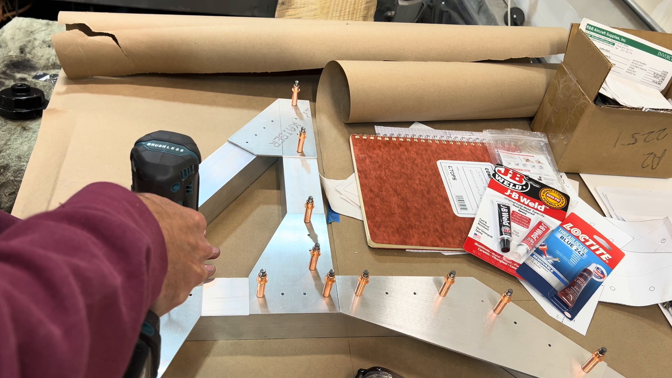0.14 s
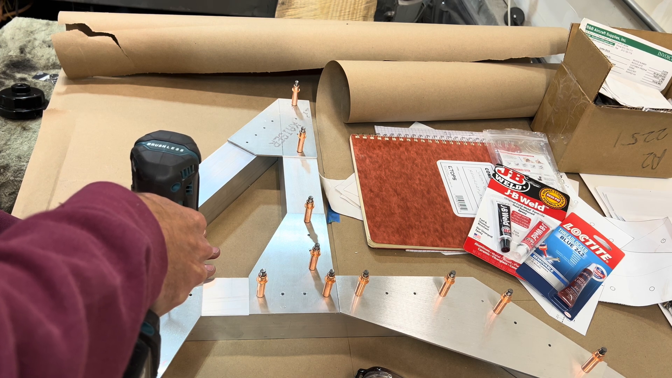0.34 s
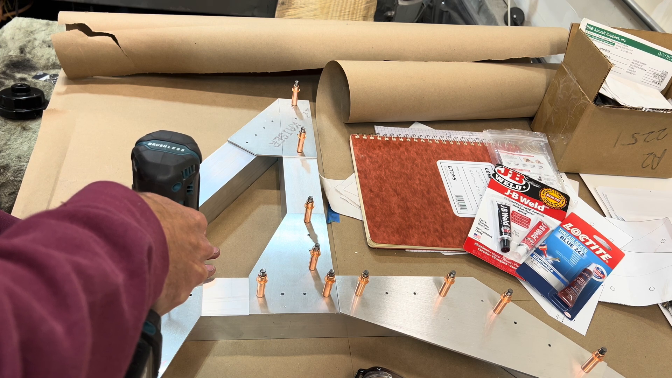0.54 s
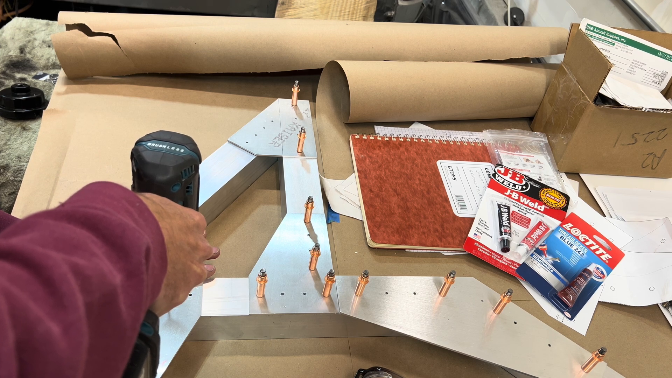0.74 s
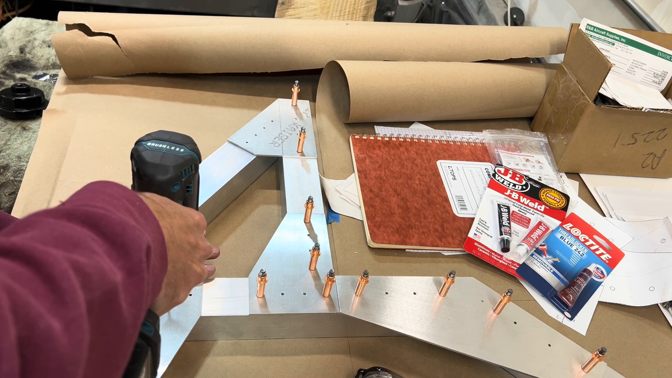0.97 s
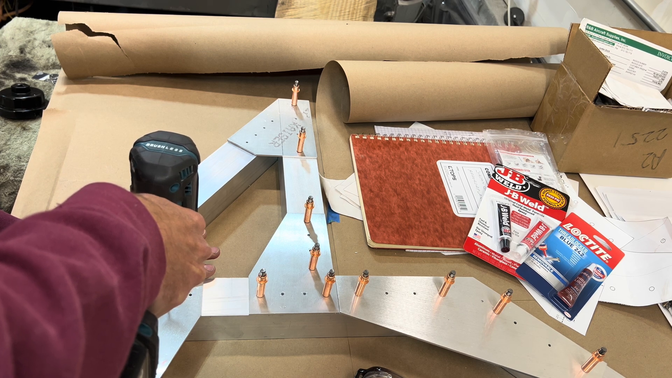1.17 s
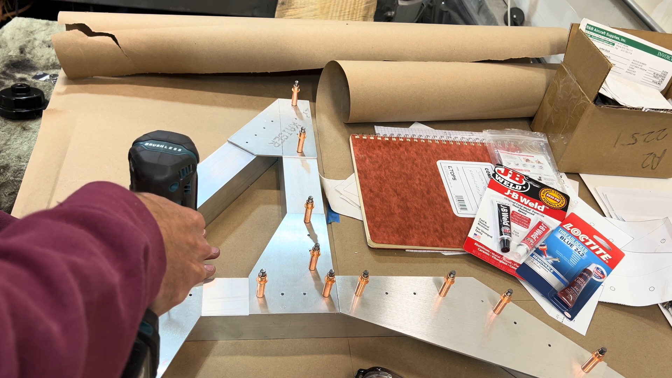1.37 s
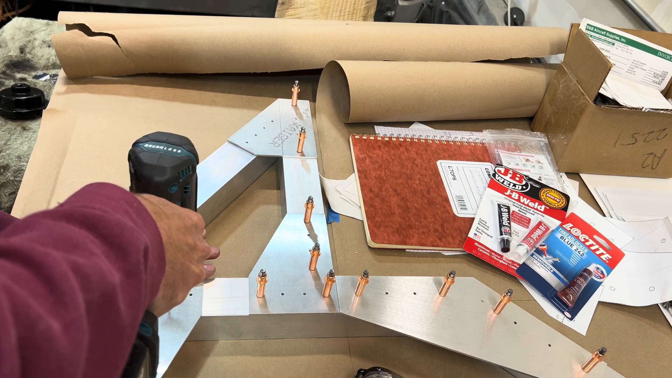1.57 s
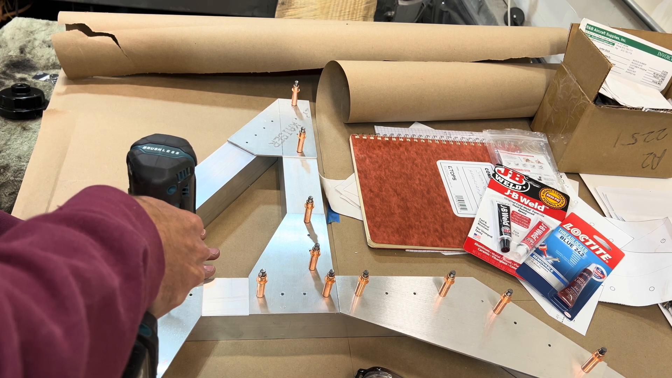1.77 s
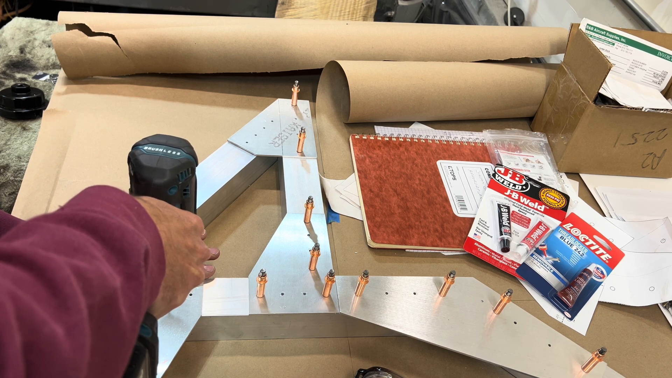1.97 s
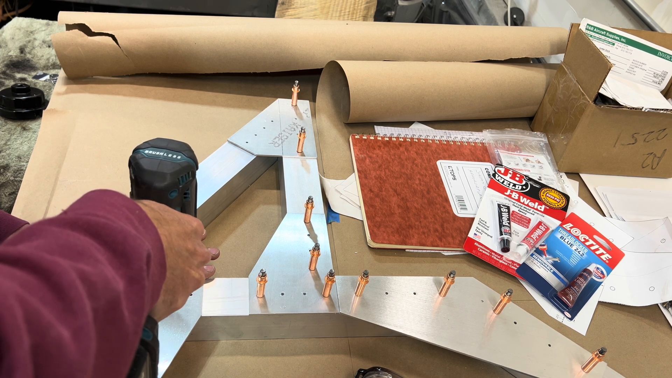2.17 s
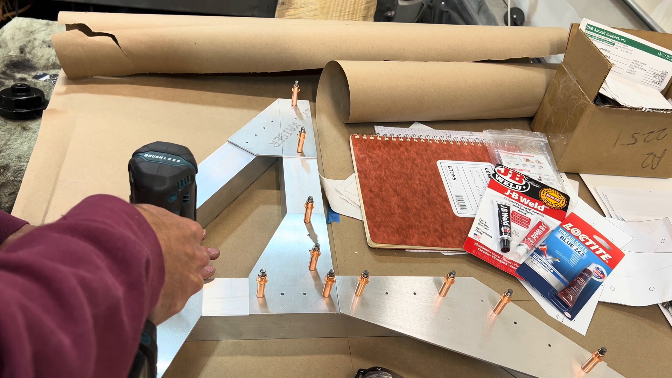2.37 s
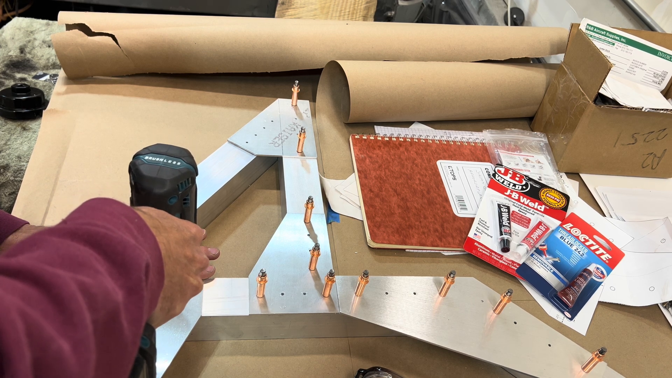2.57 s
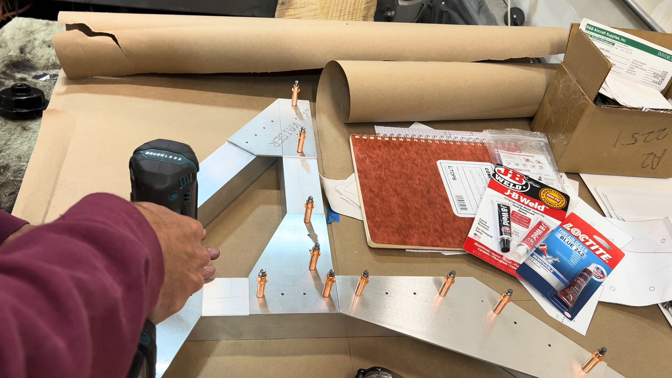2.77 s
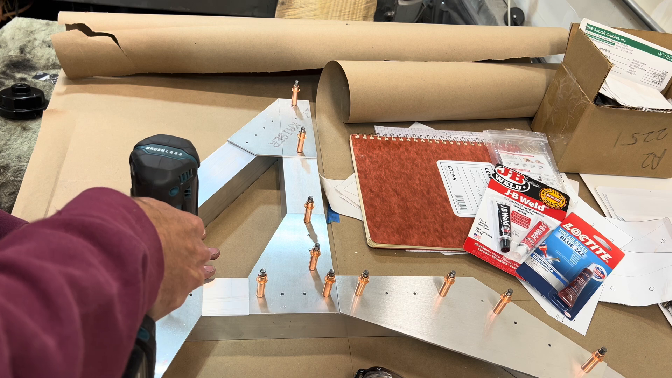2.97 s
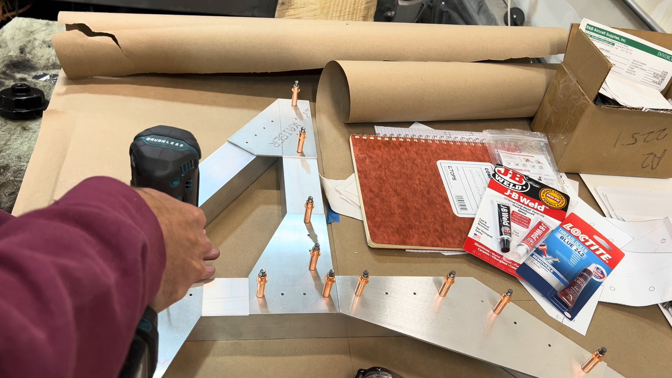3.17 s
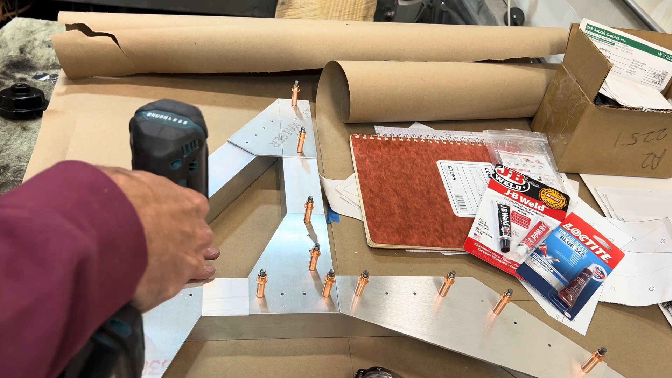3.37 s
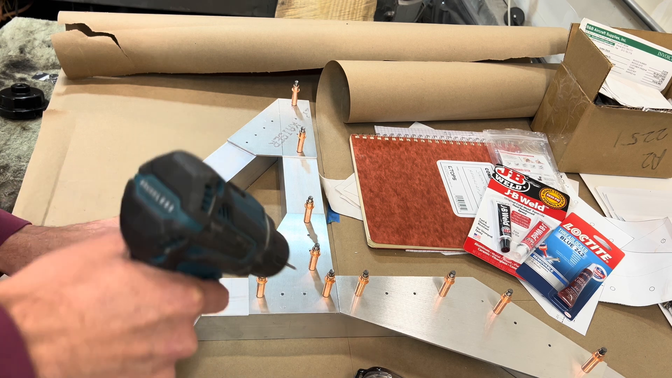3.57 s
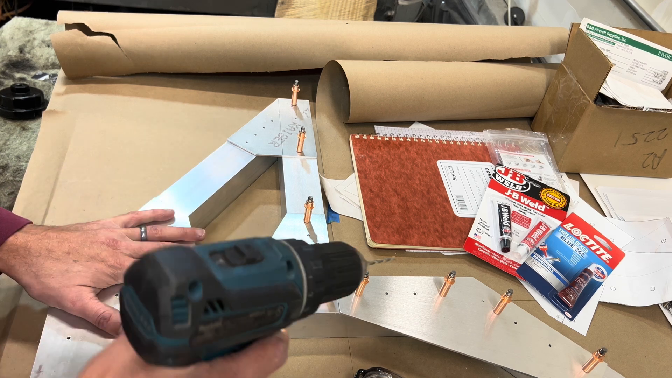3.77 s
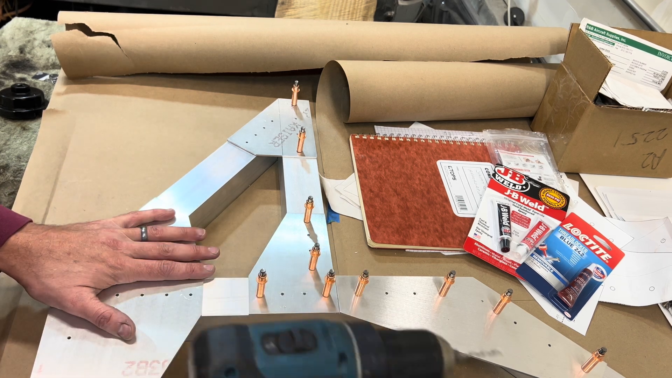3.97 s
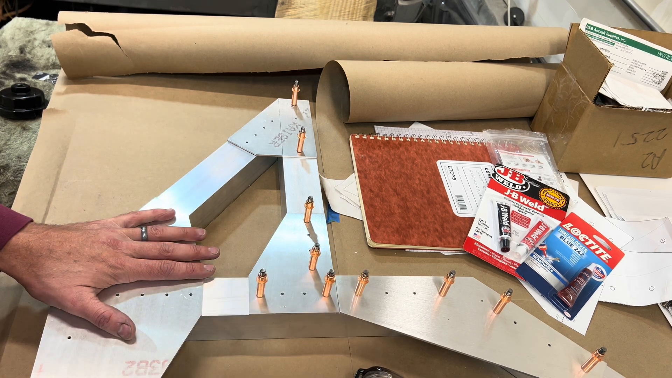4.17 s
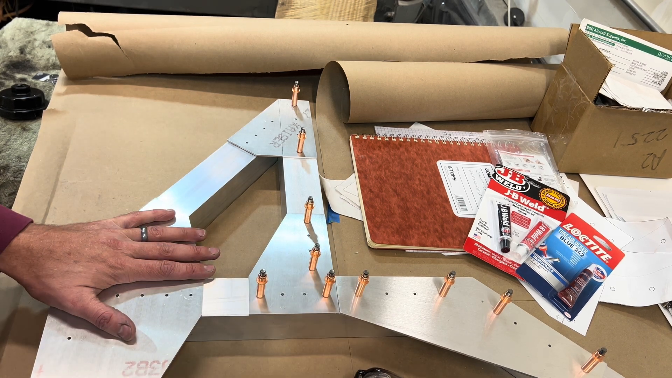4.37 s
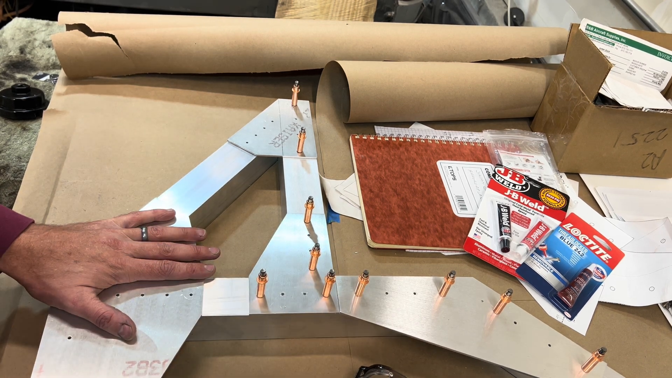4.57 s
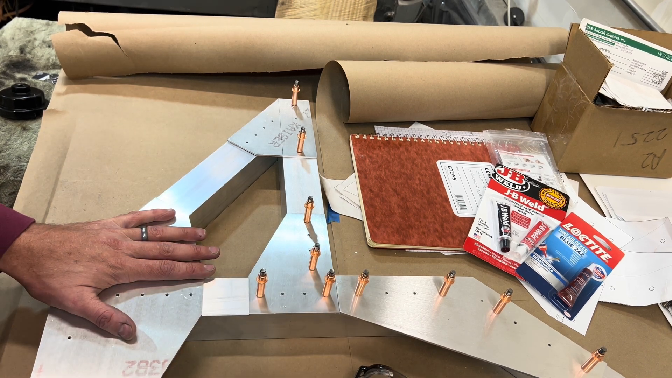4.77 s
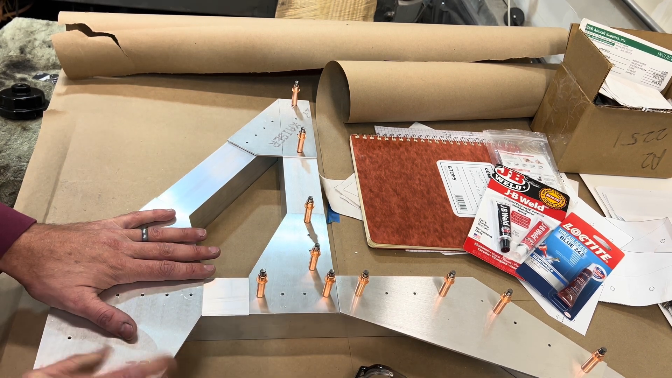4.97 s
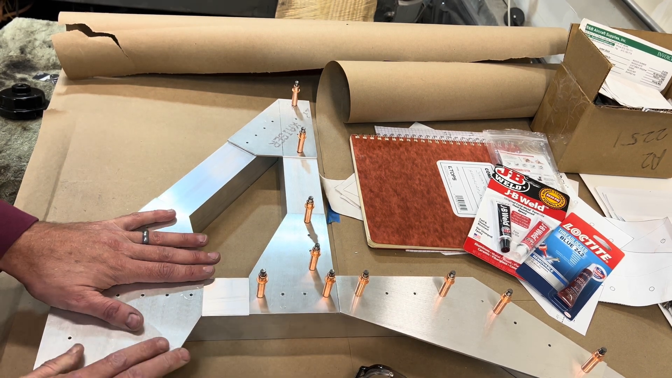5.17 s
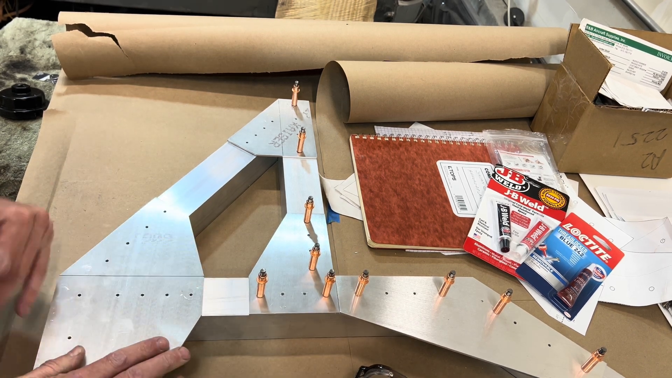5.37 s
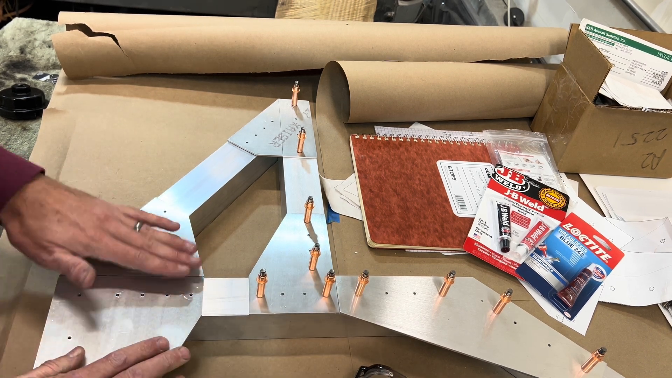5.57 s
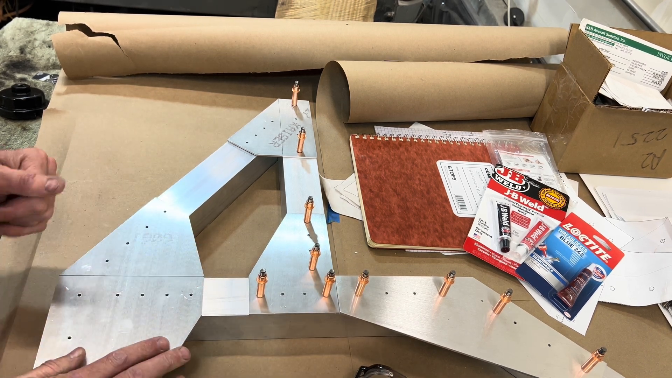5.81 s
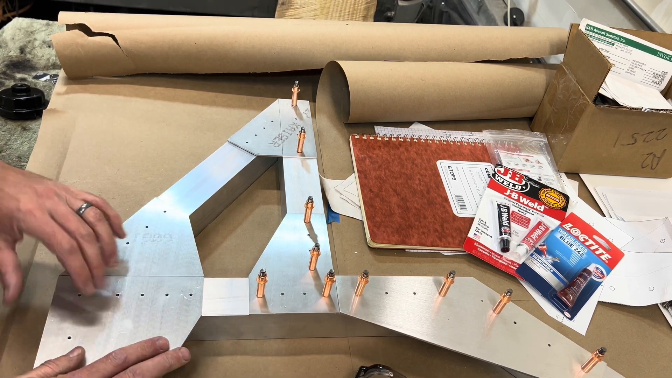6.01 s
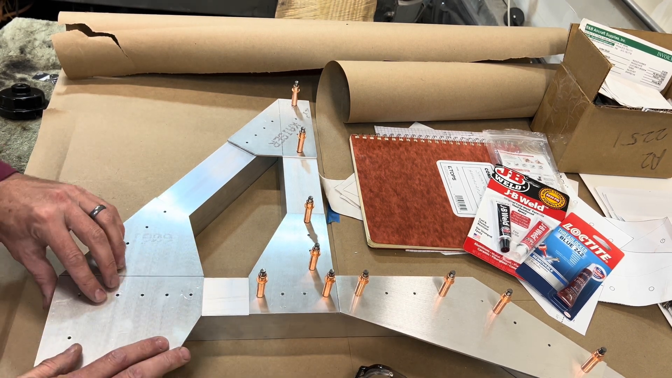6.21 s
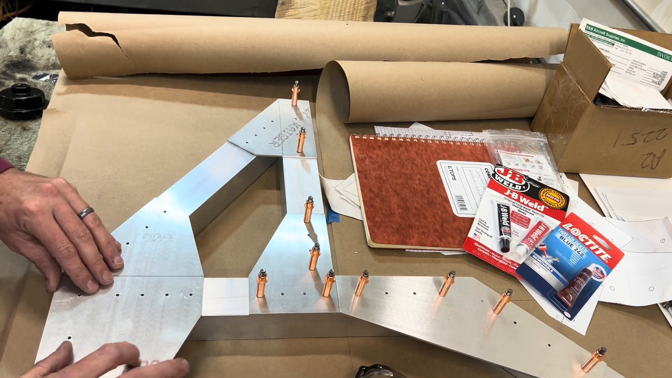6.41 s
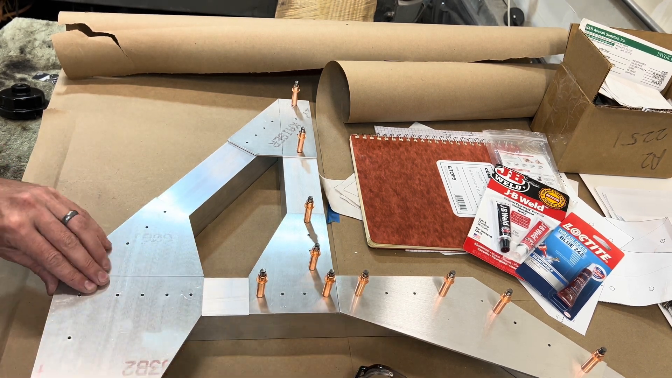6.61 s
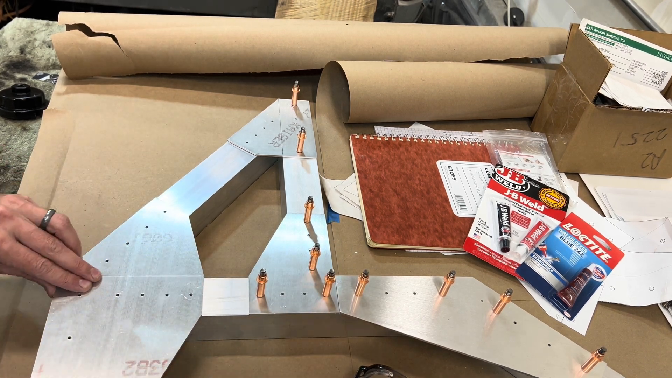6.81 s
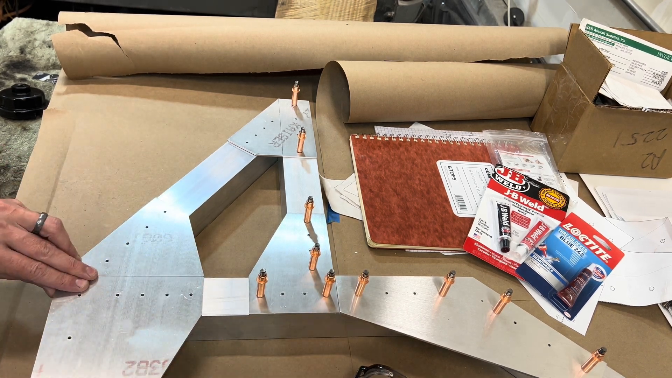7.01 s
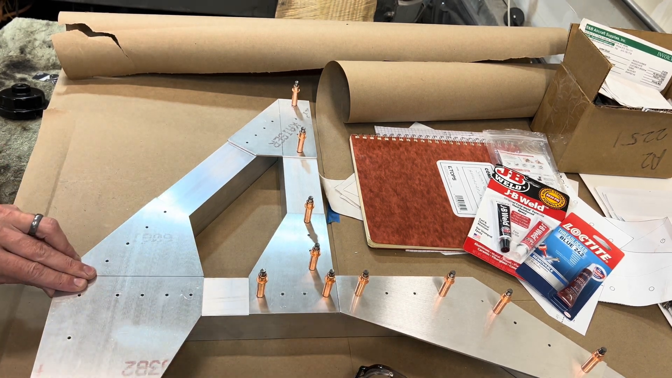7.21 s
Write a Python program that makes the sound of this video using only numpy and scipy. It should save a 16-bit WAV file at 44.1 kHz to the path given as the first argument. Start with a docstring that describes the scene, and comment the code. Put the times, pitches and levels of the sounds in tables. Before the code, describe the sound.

A cordless drill whines and rattles steadily in sheet metal, stops dead, then is set down with a heavy thud, small knocks and hand taps.

```python
"""A cordless drill runs at full speed in an aluminium sheet on a workbench, then brakes: its gears rattle
as noise hits ringing the housing, over motor whine from steady tones, with shaped noise for hiss and shudder.
It is stood on the bench and rocks to rest: falling thuds, bench boom, clatter, battery rattle and clinks.
A hand brushes the sheet twice, taps it with a ring and slides across it: patchy noise, glides and cracks.
All of it echoes in a small workshop with quiet air."""
import sys
import numpy as np
from scipy import signal
from scipy.fft import rfft, irfft, next_fast_len
from scipy.io import wavfile
from scipy.ndimage import map_coordinates

SR = 44100
rng = np.random.default_rng(int(sys.argv[2]) if len(sys.argv) > 2 else 0)


def file_out(sig):
    """Save sig as 16-bit WAV at sys.argv[1]."""
    # one column per channel
    cols = np.atleast_2d(sig).T
    # limit, then scale
    lim = np.clip(cols, -1, 1)
    pcm = np.round(lim * 32767).astype(np.int16)
    wavfile.write(sys.argv[1], SR, pcm)


N = 319725

# Room and air
# quiet air of the workshop: pitch_hz, level_db [dB per Hz]
AIR_SPECTRUM = [(15, -38.5), (25, -3), (59, 6.5), (142, -9.5), (181, -11), (833, -19), (1720, -14.5),
                (3010, -24), (15000, -37.5)]
AIR_DB = -73
# reverberation of the workshop: pitch_hz, t60_s
ROOM_T60 = [(100, 0.36), (400, 0.93), (1000, 0.58), (2900, 0.62), (4300, 0.45), (8000, 0.44), (15000, 0.16)]

# Hand on the sheet
# strokes: start_s (of the hold), rise_s, hold_s, fade_s, hiss_db, rub_db, rumble_db, left_minus_right_db
STROKES = [(3.722, 0.86, 0.18, 0.57, -70.5, -71, -65, 4), (4.272, 0.031, 0.038, 0.11, -72, -63, -56, 3),
           (4.68, 0.055, 0.092, 0.43, -68, -66, -45.5, 3),
           (5.09, 0.11, 0.024, 0.092, -67.5, -63.5, -44.5, 2),
           (5.256, 0.095, 0.0096, 0.077, -60.5, -58, -67, -1),
           (5.283, 0.059, 0.046, 0.065, -48, -59, -51, 2), (5.645, 0.027, 0.052, .04, -48, -60, -58.5, 2.5),
           (6.148, 0.048, 0.011, 0.047, -69, -64.5, -58, 2.5),
           (6.264, 0.066, 0.096, 0.19, -72, -70, -86, 4.5), (6.485, 0.025, 0.012, 0.089, -71, -70, -81, 4),
           (6.654, 0.1, 0.04, 0.19, -62.5, -71, -74, 3), (6.686, 0.047, 0.088, 0.78, -77.5, -62.5, -58, 4)]
# hiss of a firm stroke: pitch_hz, level_db [dB per Hz]
FIRM_HISS = [(1180, -37.5), (2000, -19), (2710, -17), (4080, 2), (7260, -4.5), (8750, 3), (10000, -11.5),
             (12200, 0.5), (15800, -14.5)]
# hiss of a light stroke: pitch_hz, level_db [dB per Hz]
LIGHT_HISS = [(1000, -11), (2300, -1), (3100, 0), (4200, 0), (6000, 2.5), (9000, -13), (15000, -28.5)]
# dull rub: pitch_hz, level_db [dB per Hz]
RUB_SPECTRUM = [(300, -3), (700, -1), (1000, -4.5), (1500, -4.5), (2200, -3.5), (2800, -20.5), (5000, -31),
                (15000, -50.5)]
# rumble of the sheet: pitch_hz, level_db [dB per Hz]
RUMBLE_SPECTRUM = [(35, -20.5), (60, 11), (90, -1.5), (120, 6.5), (165, 3), (280, -2), (400, -4),
                   (600, -43.5), (1200, -31.5), (5000, -70)]
# unevenness of the friction: depth_db, span_hz, span_s
PATCHES = (2.5, 500, .016)
RUMBLE_LINGER_S = 0.14  # extra fade of the rumble after a stroke
# gliding scrapes: middle_s, half_length_s, first_hz, last_hz, width_hz, level_db
SCRAPES = [(5.215, .08, 3590, 4350, 1610, -59.5), (5.246, .03, 3000, 4400, 2800, -46),
           (5.251, .022, 1705, 803, 900, -49), (5.295, .07, 5200, 6400, 900, -53),
           (5.638, .036, 1104, 2900, 402, -60), (5.682, .05, 3500, 4320, 500, -57.5),
           (5.699, .04, 5580, 6430, 600, -54), (6.139, .03, 1000, 1410, 700, -67),
           (6.279, .09, 3800, 4230, 1200, -76.5)]
# light hard contacts on the sheet: start_s, level_db, crack_centre_hz, ring_db
TICKS = [(4.9493, -39, 1208, -21.5), (4.962, -44.5, 2200, -26), (5.075, -36.5, 1210, -31),
         (5.334, -26.5, 900, -24), (5.621, -37, 990, -16), (6.0721, -49.5, 1800, -23),
         (6.547, -25, 6570, -2), (6.641, -40.5, 1210, -20), (7.164, -48, 793, -25.5)]
# crack of a contact: pitch_hz, level_db [dB per Hz]
CRACK_SPECTRUM = [(500, 22), (1100, 12), (1700, 1), (2700, 10), (3300, -4), (4100, 5.5), (8500, 1),
                  (13000, 0), (16000, -14)]
# ringing modes of the sheet: pitch_hz, level_db, decay_s
SHEET_MODES = [(1173, -32, 0.17), (1290, -24, .03), (1695, -3, 0.018), (2070, -18, .04), (2290, -20, 0.076),
               (2480, -19, .025), (2690, -18, .045), (2988, -28, .05), (4020, -27, 0.076),
               (4330, -20, .045), (4829, -19, 0.027)]

# Drill and hand on the bench
# soft blows: start_s, level_db, pitch_hz, left_minus_right_db, boom_db
KNOCKS = [(4.272, -9, 228, 3, -8), (4.296, -34, 176, 1, -12), (4.327, -30, 324, 0, -7),
          (4.339, -31, 315, 6, -2), (4.3735, -18.5, 223, 1, -3), (4.522, -18.5, 264, 4, -11),
          (4.56, -26.5, 202, -4, 8), (4.673, -21, 228, 5, -3.5), (4.799, -23, 210, 2.5, -0.5),
          (4.874, -33.5, 223, -1, 8.5), (4.972, -27.5, 173, 4, 5.5), (5.048, -29.5, 203, 3, 5.5),
          (5.127, -29, 205, -1, -6), (5.247, -30, 193, 2, -9), (5.334, -40.5, 503, -3, 7),
          (5.352, -25.5, 197, 1.5, -2), (5.44, -37.5, 231, -3, 6.5), (5.642, -38, 176, 1, 5),
          (6.081, -46, 169, 4, 8.5), (6.321, -51.5, 503, 1.5, -15.5), (6.393, -59, 416, 5, -15),
          (6.675, -41.5, 120, 10, -1)]
THUD_PEAK_S, THUD_DB, CLATTER_DB = .0033, -5, -16.5  # time to peak; levels relative to the blow
# slow modes of the bench top: pitch_hz, level_db, decay_s
BENCH_MODES = [(58.5, -13.5, 0.34), (71, -3.5, 0.15), (82.1, -6, 0.28)]
# things shaking on the bench: pitch_hz, level_db [dB per Hz]
CLATTER_SPECTRUM = [(100, -20.5), (160, 8), (230, 11.5), (290, 1.5), (390, 4.5), (480, -7.5), (650, -16),
                    (1000, -22.5), (1400, -32.5), (2700, -29.5), (5000, -43), (9500, -50), (12000, -62.5),
                    (15000, -63)]
# clacks of the loose battery: start_s, level_db
BATTERY_CLACKS = [(4.2722, -27.5), (4.278, -38), (4.288, -39), (4.311, -42), (4.327, -39), (4.334, -40),
                  (4.3387, -40), (4.376, -46), (4.522, -45), (4.669, -41), (4.798, -51), (5.075, -47)]
# modes of the plastic case: pitch_hz, level_db, t60_s
CASE_MODES = [(545, -6.5, 0.044), (688, -5, 0.028), (897, -6, 0.023), (1054, -10.5, 0.022),
              (1420, -12, 0.018)]
# touches and skids of the drill's hard foot: start_s, peak_db, pitch_hz, decay_s
FOOT_TOUCHES = [(4.2235, -39.5, 2800, .006), (4.238, -42.5, 2900, .006), (4.272, -43, 2700, .006),
                (4.439, -42.5, 3300, .003), (4.510, -44, 2600, .008), (4.522, -43.5, 2600, .007),
                (4.5783, -52, 1800, .004), (4.6667, -45, 5000, .005)]
# resonances of the foot: pitch_hz, width_hz, level_db
FOOT_MODES = [(1000, 300, -13), (1900, 250, -7), (2450, 170, 0), (2720, 110, 0), (3900, 220, -3.5),
              (4500, 400, -13)]
# clinks of a small loose metal part: start_s, level_db
CLINKS = [(4.2233, -63), (4.262, -58), (4.2712, -52), (4.3041, -56), (4.355, -59), (4.5221, -60),
          (4.5331, -53), (4.666, -43)]
# modes of that part: pitch_hz, level_db, t60_s
CLINK_MODES = [(8200, 0, 0.017), (9080, -6, 0.022), (9380, -9, .02)]

# Running drill
# motor shaft, sagging under load and braked at the end: time_s, speed [turns per second]
SHAFT_SPEED = [(0, 294.6), (.5, 294.4), (1.15, 293.4), (1.4, 292.3), (1.53, 291.3), (1.72, 293.3),
               (2.1, 294.4), (2.75, 295.1), (3.35, 295.1), (3.41, 285), (3.46, 60)]
RELEASE_S, CUTOUT_DB_PER_S = 3.37, 599.5  # the trigger is let go and the whine stops
BRAKE_S, BRAKE_DB_PER_S = 3.409, 699.5  # the motor brakes and the rattle dies
FAN_LAG_S = .008  # the hiss dies a little after the rattle
# two microphone ports, phase of the drill: pitch_hz, left_lead [radians]
PORT_PHASE = [(60, 0), (250, -.5), (600, 1.1), (1200, 2.1), (2000, 3), (3000, 3.7), (3500, 4.3),
              (3800, 5.9), (4400, 6.2), (5000, 5.9), (5500, 6.8), (7000, 6.9), (7400, 8.9), (8600, 7),
              (9700, 3.1), (11300, 0), (15000, -2)]
# two microphone ports, balance of the drill: pitch_hz, left_minus_right_db
PORT_TILT = [(70, -4.5), (180, 8.5), (330, -0.5), (900, 3.5), (1300, 0.5), (2600, -2), (2870, 2.5),
             (3100, -1.5), (3700, -0.5), (4200, 4), (4750, 2.5), (5300, 7), (7000, 2.5), (10000, 0)]
# tones of motor and gears: multiple [of the shaft speed]
MULTIPLES = (4, 5, 6, 8, 9.752, 21.33, 24)
# offset of each of these tones from its base level: level_db
TONE_OFFSETS = [6.5, -3, -24, -2, 6, -14.5, 1]
MOTOR_HUM_DB = -44.5  # base level of the tones without a curve of their own
# base level of the commutation tone, the first multiple: time_s, level_db
COMMUTATION_LEVEL = [(0, -55), (.4, -51), (.9, -52), (1.3, -50.5), (1.55, -57), (1.7, -50.5), (2.15, -50.5),
                     (2.38, -49), (2.54, -44.5), (2.65, -49), (2.95, -48), (3.25, -57)]
# base level of the high whistle, the last multiple: time_s, level_db
WHISTLE_LEVEL = [(0, -54), (.45, -55), (.8, -46), (1.15, -49), (1.4, -55), (1.6, -53), (1.95, -45),
                 (2.5, -54), (2.72, -48), (3, -60), (3.28, -49)]
SWITCH_HZ = 7992  # switching tone of the motor's inverter
# inverter whistle, from one commutation step below the switching tone upward: level_db
SIDEBANDS = [-57, -68, -63, -75]
WAVER_DB = 1.7  # wavering of the tones
GEAR_RATIO, SWELL_S, SWELL_DB = 63, .195, 3.3  # the load swells once in each turn of the chuck
WHINE_ROOM_DB = -20  # the whine is heard mostly direct
RATTLE_DB, DRIFT_DB = -27, .3  # the gears rattle evenly at full speed
# resonances of the gear housing: pitch_hz, spread_hz, level_db
HOUSING = [(3133, 420, -3), (4124, 520, -0.5), (4936, 426, 0.47)]
GRIP_SHIFT = .007  # shift of the resonances with grip and load, as a share of the middle one
FLUTTER_DB, FLUTTER_HZ = 1.0, 230  # the gears chatter in short bursts
THROB = .07  # depth of the throb at each turn of the planet carrier
# pitch_hz, level_db [dB per Hz]
HISS_SPECTRUM = [(300, -9.5), (550, -10), (900, -0.5), (1500, 1.5), (1720, 2.5), (2000, 1.5), (2700, 2),
                 (3600, -3.5), (6400, -0.5), (6900, -6.5), (7500, -3), (9450, -5), (10200, -29.5),
                 (11500, -8), (15800, -11)]
# level of the shudder, uneven, with a lull near 2.5 s, a last surge and a sharp fall: time_s, level_db
SHUDDER_LEVEL = [(0, -49), (.6, -46), (.75, -49.5), (1.0, -47), (1.45, -46.8), (1.85, -48), (2.2, -49.5),
                 (2.35, -53.5), (2.62, -55), (2.85, -46), (3.11, -44.5), (3.21, -62), (3.38, -68)]
# shudder of the sheet: pitch_hz, level_db [dB per Hz]
SHUDDER_SPECTRUM = [(18, -38.5), (30, -16.5), (42, -14.5), (54, 2), (124, -8.5), (171, 4.5), (220, -7.5),
                    (259, -2.5), (309, -7.5), (337, 5), (368, -11.5), (392, -6.5), (600, -20), (780, -53),
                    (1320, -120)]
EDGE_HZ = 15900  # band limit of the recorder

T = np.arange(N) / SR
HZ = np.fft.rfftfreq(N, 1 / SR)
TURNS = np.cumsum(np.interp(T, *np.transpose(SHAFT_SPEED))) / SR  # turns of the motor shaft so far


def amp(db):
    """Decibels to gain."""
    return 10 ** (np.asarray(db) / 20)


def unit(x):
    """Scales to an rms of 1."""
    return x / np.sqrt(np.mean(x ** 2) + 1e-30)


def read(points, hz):
    """Reads a table on a log-frequency axis."""
    f, value = np.transpose(points)
    return np.interp(np.log(hz + 1), np.log(f + 1), value)


def add(mix, s, sound):
    """Adds a stereo sound to the mix at time s."""
    part = mix[:, round(s * SR):][:, :sound.shape[1]]
    part += sound[:, :part.shape[1]]


def sides(db):
    """Gains of the two channels for a left - right level."""
    return amp(np.array([[db], [-db]]) / 2)


def colour(x, spectrum):
    """Gives x a spectrum and an rms of 1."""
    size = next_fast_len(x.shape[-1])
    hz = np.fft.rfftfreq(size, 1 / SR)
    return unit(irfft(rfft(x, size) * amp(read(spectrum, hz)), size)[..., :x.shape[-1]])


def wander(hz):
    """Smooth chance of rms 1 that changes hz times a second."""
    return unit(np.interp(T * hz, np.arange(N), rng.standard_normal(N)))


def diffuse(spectrum, alike_hz=260):
    """Noise from all round: the two ports agree only in the bass."""
    mid, side = rfft(rng.standard_normal((2, N)))
    same = 1 / (1 + (HZ / alike_hz) ** 2)
    mid, side = mid * np.sqrt(1 + same), side * np.sqrt(1 - same)
    return colour(irfft(np.array([mid + side, mid - side]), N), spectrum)


def echoes(x, t60, start):
    """Sparse reflections from start seconds on, each band dying at its own speed; energy 1."""
    size = SR * 2 // 3
    signs = rng.choice([-1., 1.], (2, size))
    taps = signs * (rng.random((2, size)) < .1)
    hz, t, z = signal.stft(taps, SR, nperseg=128)
    z = z * 1000. ** (-t / read(t60, hz)[:, None])
    tail = signal.istft(z, SR, nperseg=128)[1]
    tail = tail / np.linalg.norm(tail, axis=1, keepdims=True)
    tail = np.pad(tail, ((0, 0), (round(abs(start) * SR), 0)))
    return signal.oaconvolve(x, tail, axes=1)[:, :N]


def resonate(x, hz, width):
    """A resonance of gain 1 that follows the curve hz."""
    turn = np.exp(2j * np.pi * np.cumsum(hz * np.ones(x.shape[-1])) / SR)
    r = np.exp(-np.pi * abs(width) / SR)
    return 2 * (turn * signal.lfilter([1 - r], [1, -r], x / turn + 1e-18)).real


def causal(power):
    """Response with this power spectrum that starts at once and then rings out."""
    log_gain = np.log(power + 1e-12) / 2
    mirrored = np.concatenate([log_gain, log_gain[:0:-1]])
    return np.exp(np.conj(signal.hilbert(mirrored)))[:len(power)]


def workshop_air():
    """Quiet air of the workshop: steady noise from all round."""
    return amp(AIR_DB) * diffuse(AIR_SPECTRUM)


def pressure(s, rise, hold, fade):
    """Pressure builds up to s, 20 dB in the rise time, holds, and falls by 20 dB in each fade time."""
    before = (np.maximum(s - T, 0) / rise) ** 2
    after = np.maximum(T - s - hold, 0) / fade
    return amp(-20 * (before + after))


def patchy(x, depth_db, span_hz, span_s):
    """Roughens a noise: patches of its spectrum flare and fade on their own."""
    z = signal.stft(x, SR, nperseg=256, noverlap=192)[2]
    bins, frames = np.indices(z.shape[1:])
    place = [bins * SR / 256 / span_hz, frames * 64 / SR / span_s]
    field = unit(map_coordinates(rng.standard_normal(z.shape[1:]), place, order=1, mode="wrap"))
    return unit(signal.istft(z * amp(depth_db * field), SR, nperseg=256, noverlap=192)[1][:, :N])


def hand(skin_db=1, rub_db=-1, rumble_db=-4, firm_db=-69.0, grain_db=0.5, catch_db=0.5):
    """Skin and sleeve catch and slip on the sheet: a grainy hiss, a dull rub and a rumble."""
    skin, rub, rumble = np.zeros((3, 2, N))
    for s, rise, hold, fade, hiss_level, rub_level, rumble_level, pan in STROKES:
        press = sides(pan) * pressure(s, rise, hold, fade)
        skin = skin + amp(hiss_level) * press
        rub = rub + amp(rub_level) * press
        linger = sides(pan) * pressure(s, rise, hold, fade + RUMBLE_LINGER_S)
        rumble = rumble + amp(rumble_level) * linger
    firm = skin / (skin + amp(firm_db))  # light strokes take on the light spectrum
    firm_hiss = firm * patchy(diffuse(FIRM_HISS), *PATCHES)
    light_hiss = np.sqrt(1 - firm ** 2) * patchy(diffuse(LIGHT_HISS), *PATCHES)
    hiss = amp(skin_db) * skin * (firm_hiss + light_hiss)
    dull = amp(rub_db) * rub * patchy(diffuse(RUB_SPECTRUM), *PATCHES)
    catches = unit(amp(grain_db * wander(900) + catch_db * wander(110)))
    return (hiss + dull) * catches + amp(rumble_db) * rumble * diffuse(RUMBLE_SPECTRUM)


def scrapes(grain_db=1.5, pan_db=5.0):
    """Grainy friction in a resonance that glides as the hand lands on the sheet and slides."""
    out = np.zeros((2, N))
    for s, length, first_hz, last_hz, width, db in SCRAPES:
        u = np.arange(-length, length, 1 / SR) / length
        hz = first_hz * (last_hz / first_hz) ** np.clip(u + .5, 0, 1)
        noise = rng.standard_normal((2, len(u))) + 1j * rng.standard_normal((2, len(u)))
        band = signal.sosfilt(signal.butter(2, width / 2, fs=SR, output="sos"), noise)
        glide = unit((band * np.exp(2j * np.pi * np.cumsum(hz) / SR)).real)
        add(out, s - length, amp(db) * sides(pan_db) * glide * np.cos(np.pi * u / 2) ** 2)
    return out * unit(amp(grain_db * wander(800)))


def ticks(crack_time=0.0031, crack_db=-7, focus_db=2.5, pan_db=5, near_db=-5):
    """A short crack and the ring of the sheet, damped where it lies on paper."""
    out, t = np.zeros((2, N)), np.arange(SR // 4) / SR
    ring = sum(amp(level) * 0.0024 ** (t / decay) * np.sin(2 * np.pi * hz * t)
               for hz, level, decay in SHEET_MODES)
    onset = 1 - np.exp(-t / 0.00052)
    for s, db, centre, ring_db in TICKS:
        # a harder contact puts its energy higher up
        spectrum = [(hz, level - focus_db * np.log2(hz / centre) ** 2) for hz, level in CRACK_SPECTRUM]
        crack = colour(rng.standard_normal((2, len(t))), spectrum) * np.exp(-t / crack_time)
        contact = amp(crack_db) * crack + amp(ring_db) * ring
        add(out, s, amp(db) * sides(pan_db) * contact * onset)
    # card and paper nearby return little treble
    dulled = signal.sosfilt(signal.butter(1, 4500, fs=SR, output="sos"), out)
    return out + amp(near_db) * echoes(dulled, [(1000, 0.03), (10000, 0.042)], start=0.0087)


def clinks(pan_db=2):
    """A small loose metal part of the drill rings briefly at each jolt, high above the thuds."""
    out, t = np.zeros((2, N)), np.arange(SR // 10) / SR
    for s, db in CLINKS:
        ring = sum(amp(level - 60 * t / t60) * np.sin(2 * np.pi * (hz * t + rng.random((2, 1))))
                   for hz, level, t60 in CLINK_MODES)
        add(out, s, amp(db) * sides(pan_db) * ring * (1 - np.exp(-t / .0005)))
    return out


def foot(focus_db=4, pan_db=4):
    """Each touch is a short burst of slips that rings the drill's foot, most near the contact pitch."""
    out, t = np.zeros((2, N)), np.arange(SR // 10) / SR
    for s, db, centre, decay in FOOT_TOUCHES:
        # partly shared by the two channels
        slips = rng.standard_normal(len(t)) + .6 * rng.standard_normal((2, len(t)))
        slips = slips * np.exp(-t / decay) * (1 - np.exp(-t / .0007))
        slips = signal.sosfilt(signal.butter(2, 1.5 * centre, fs=SR, output="sos"), slips)
        ring = sum(amp(level - focus_db * np.log2(hz / centre) ** 2) * resonate(slips, hz, width)
                   for hz, width, level in FOOT_MODES)
        add(out, s, amp(db) * sides(pan_db) * ring / abs(ring).max())
    return out


def battery(pan_db=2, detune=0.047):
    """Each clack of the loose battery rings the plastic case, a little differently every time."""
    out, t = np.zeros((2, N)), np.arange(SR // 10) / SR
    for s, db in BATTERY_CLACKS:
        ring = np.zeros(len(t))
        for hz, level, t60 in CASE_MODES:
            pitch = hz * (1 + detune * rng.standard_normal())
            ring += amp(level - 60 * t / t60) * np.sin(2 * np.pi * pitch * t)
        add(out, s, amp(db) * sides(pan_db) * ring * (1 - np.exp(-t / 0.0013)))
    return out


def knocks(boom_rise=0.028, boom_delay=0.0099, clatter_decay=0.29, glide=0.95, glide_time=0.0021, jolt_db=2):
    """Each blow is a damped thud; the bench top then booms and the things on it shake."""
    out, t = np.zeros((2, N)), np.arange(SR * 2 // 3) / SR
    shake = unit(diffuse(CLATTER_SPECTRUM, alike_hz=279) * amp(jolt_db * wander(110)))
    shake_shape = 0.00065 ** (t / clatter_decay) * (1 - np.exp(-t / 0.0035))
    late = np.maximum(t - boom_delay, 0)
    boom = sum(amp(level) * 0.0011 ** (late / decay) * np.sin(2 * np.pi * f * late)
               for f, level, decay in BENCH_MODES)
    boom = boom * (1 - np.exp(-late / boom_rise))
    thud_shape = t / THUD_PEAK_S * np.exp(1 - t / THUD_PEAK_S) * (1 - np.exp(-t / 0.0024))
    for s, db, hz, pan, boom_db in KNOCKS:
        # the higher modes die first, so the pitch of the thud falls
        cycles = hz * (t + glide * glide_time * (1 - np.exp(-t / glide_time)))
        thud = thud_shape * np.sin(2 * np.pi * cycles)
        clatter = np.roll(shake, -round(s * SR), 1)[:, :len(t)] * shake_shape
        blow = sides(pan) * (amp(THUD_DB) * thud + amp(CLATTER_DB) * clatter)
        add(out, s, amp(db) * (blow + sides(-2.2) * amp(boom_db) * boom))
    return out


def ports(x):
    """Direct sound of the drill at the two microphone ports, which differ in phase and level."""
    size = next_fast_len(N + SR // 4)
    hz = np.fft.rfftfreq(size, 1 / SR)
    half = amp(read(PORT_TILT, hz) / 2) * np.exp(.5j * read(PORT_PHASE, hz))
    return irfft(rfft(x, size) * np.array([half, 1 / half]), size)[:, :N]


def whine(turns, jitter=.25):
    """Motor and gear orders, and the inverter's whistle with sidebands at the commutation rate."""
    angle, tones = 2 * np.pi * turns, np.zeros(N)
    swell = SWELL_DB * np.cos((angle - np.interp(SWELL_S, T, angle)) / GEAR_RATIO)
    levels = {MULTIPLES[0]: np.interp(T, *np.transpose(COMMUTATION_LEVEL)) + swell,
              MULTIPLES[-1]: np.interp(T, *np.transpose(WHISTLE_LEVEL))}
    for k, offset_db in zip(MULTIPLES, TONE_OFFSETS):
        level = levels.get(k, MOTOR_HUM_DB) + offset_db + WAVER_DB * wander(30)
        tones += amp(level) * np.cos(k * angle + jitter * wander(60))
    for step, db in enumerate(SIDEBANDS, -1):
        phase = 2 * np.pi * SWITCH_HZ * T + step * MULTIPLES[0] * angle
        tones += amp(db + WAVER_DB * wander(4.7)) * np.cos(phase)
    return np.sqrt(2) * tones  # levels are rms


def motor():
    """The whine at the microphone; it stops when the trigger is let go."""
    return ports(amp(-CUTOUT_DB_PER_S * np.maximum(T - RELEASE_S, 0)) * whine(TURNS))


def gears(turns, hits_per_s=3200, spread_db=3.0, burst_db=-0.06, burst_hz=420, repeat=0.35, sharp=1.45):
    """Teeth clash in bursts and ring the housing; part of the pattern returns as the carrier turns."""
    carrier = turns / 5
    throb = 1 + THROB * np.cos(2 * np.pi * carrier)
    strength = amp(spread_db * np.minimum(rng.standard_normal(N), 2))
    loose = rng.choice([-1., 1.], N) * strength * (rng.random(N) < hits_per_s / SR)
    # a fixed pattern of flaws comes round every two turns of the carrier
    flaws = rng.standard_normal(1500)
    worn = map_coordinates(flaws, [carrier / 2 % 1 * len(flaws)], order=3, mode="grid-wrap")
    bursts = amp(burst_db * wander(burst_hz) + FLUTTER_DB * wander(FLUTTER_HZ))
    force = (unit(loose) + repeat * worn) * bursts * throb
    power = sum(amp(db) ** 2 / (1 + ((HZ - hz) / (0.47 * spread)) ** 2) ** sharp
                for hz, spread, db in HOUSING)
    ring = signal.hilbert(irfft(rfft(force) * causal(power), N))
    shift_hz = GRIP_SHIFT * HOUSING[1][0] * wander(9)
    return unit((ring * np.exp(2j * np.pi * np.cumsum(shift_hz) / SR)).real)


def drill(gear_db=0.6, direct_db=-10.0, scatter_db=-15, shudder_db=-1, grain_db=1.5, catch_db=1.46):
    """Gear rattle, hiss of the bit and fan, and shudder of the sheet; the bench reflects the rattle."""
    running = amp(-BRAKE_DB_PER_S * np.maximum(T - BRAKE_S, 0))
    rattle_db = RATTLE_DB + DRIFT_DB * wander(10)
    clash = ports(running * amp(rattle_db + gear_db) * gears(TURNS))
    clash = clash + amp(-11) * echoes(clash, [(500, .05), (8000, .03)], start=.002)
    # the hiss comes straight from the bit and, scattered, from the whole sheet
    blowing = amp(-BRAKE_DB_PER_S * np.maximum(T - BRAKE_S - FAN_LAG_S, 0))
    air = blowing * amp(RATTLE_DB + grain_db * wander(500))
    spectrum = [(100, -39.0)] + list(HISS_SPECTRUM)
    direct = amp(direct_db) * ports(air * colour(rng.standard_normal(N), spectrum))
    scattered = amp(scatter_db) * air * diffuse(spectrum)
    # the bit catches and frees itself
    level_db = np.interp(T, *np.transpose(SHUDDER_LEVEL)) + catch_db * wander(17)
    shudder = running * amp(level_db + shudder_db) * diffuse(SHUDDER_SPECTRUM)
    return clash, direct + scattered + shudder


def scene(tick_room_db=-18, rattle_room_db=-16, hiss_room_db=-10):
    """All sources in the workshop, over its quiet air."""
    handling = hand() + scrapes() + clinks() + foot() + battery() + knocks()
    clicks = ticks()
    tones = motor()
    rattle, hiss_and_shudder = drill()
    sent = amp(rattle_room_db) * rattle + amp(hiss_room_db) * hiss_and_shudder
    sent = sent + amp(WHINE_ROOM_DB) * tones
    sent = sent + amp(-14.0) * handling + amp(tick_room_db) * clicks
    direct = rattle + hiss_and_shudder + tones + handling + clicks
    return direct + echoes(sent, ROOM_T60, start=.015) + workshop_air()


def record(dry, bass_hz=36):
    """The microphone sheds the deepest bass; then the recorder's band limit."""
    heard = signal.sosfilt(signal.butter(2, bass_hz, "high", fs=SR, output="sos"), dry)
    band_limit = signal.firwin(511, EDGE_HZ, window=("kaiser", 9), fs=SR)
    return signal.oaconvolve(heard, band_limit[None], "same")


dry = scene()
out = record(dry)
file_out(out)
```